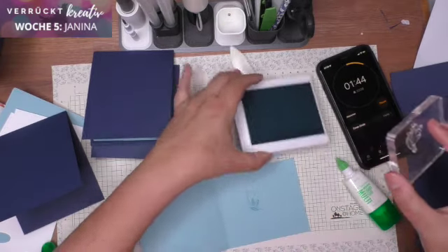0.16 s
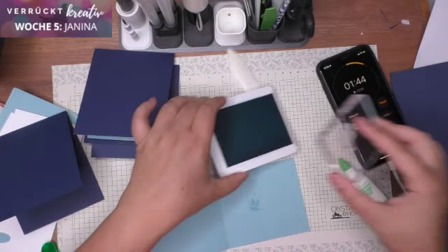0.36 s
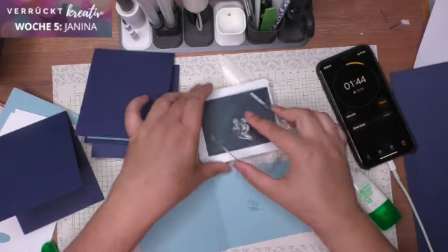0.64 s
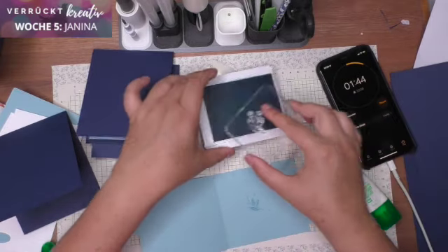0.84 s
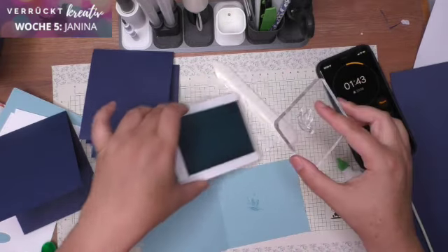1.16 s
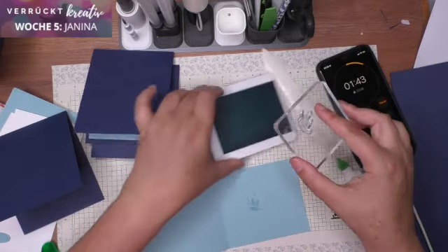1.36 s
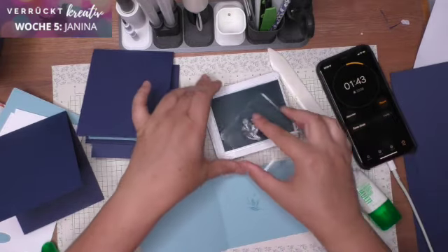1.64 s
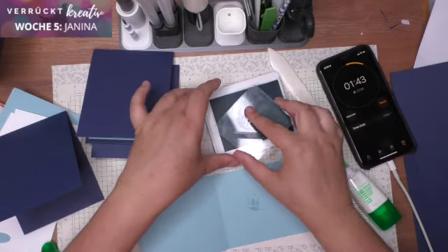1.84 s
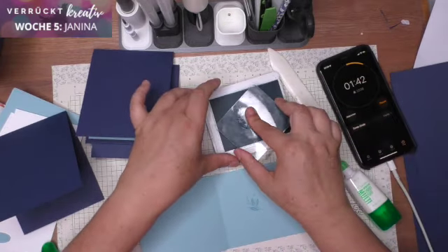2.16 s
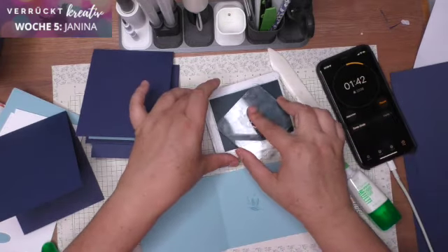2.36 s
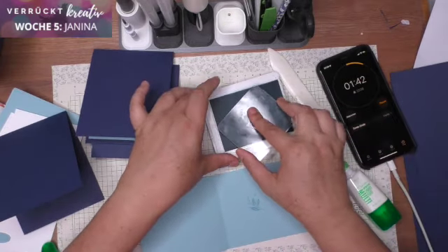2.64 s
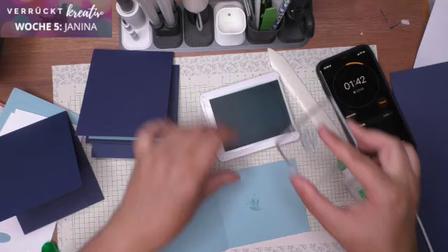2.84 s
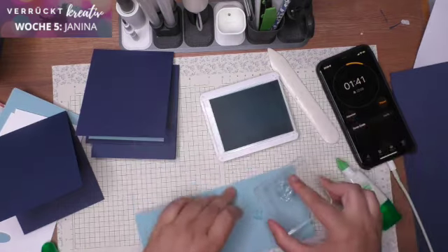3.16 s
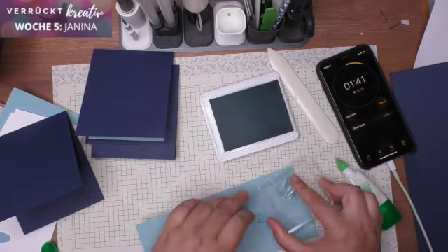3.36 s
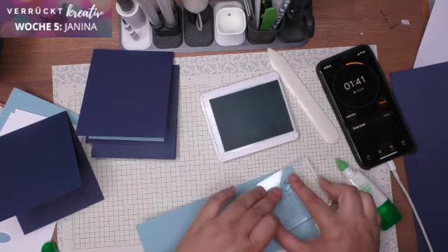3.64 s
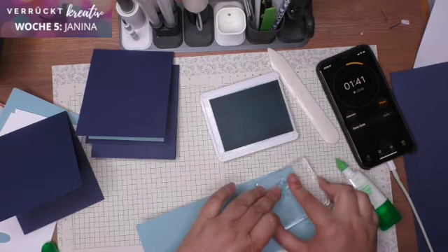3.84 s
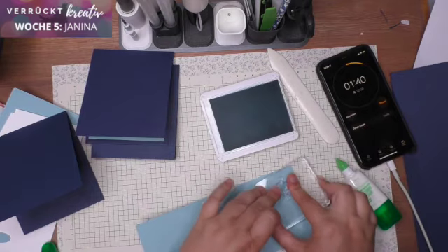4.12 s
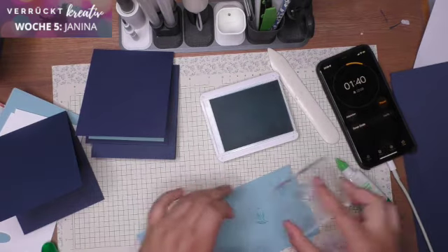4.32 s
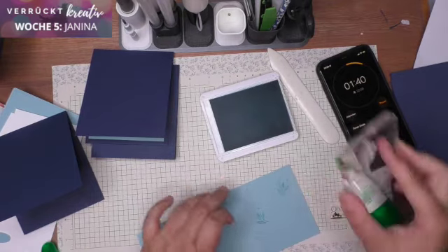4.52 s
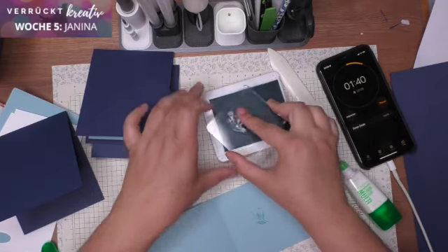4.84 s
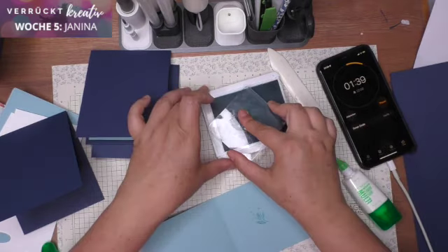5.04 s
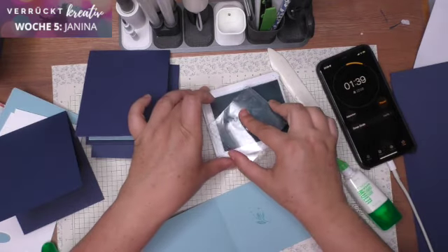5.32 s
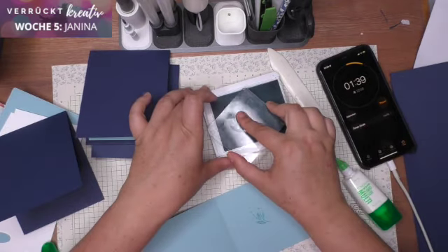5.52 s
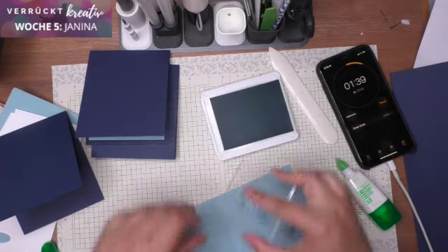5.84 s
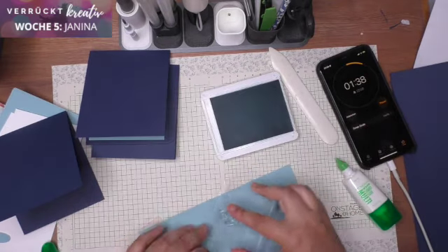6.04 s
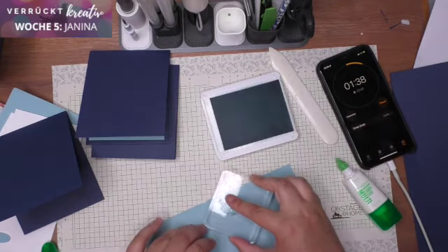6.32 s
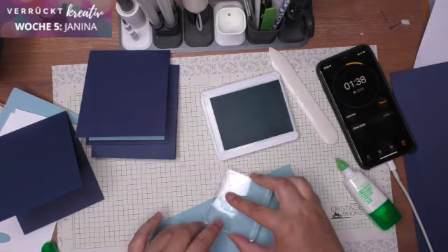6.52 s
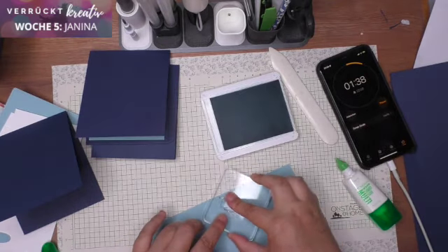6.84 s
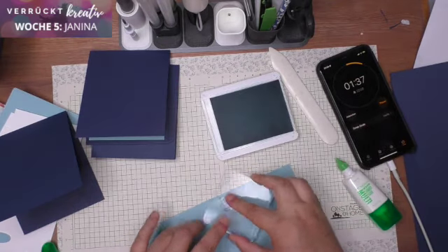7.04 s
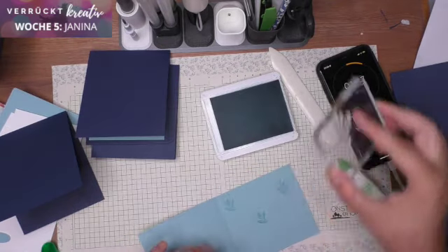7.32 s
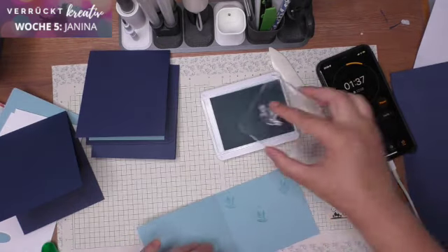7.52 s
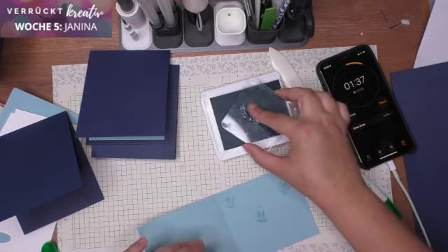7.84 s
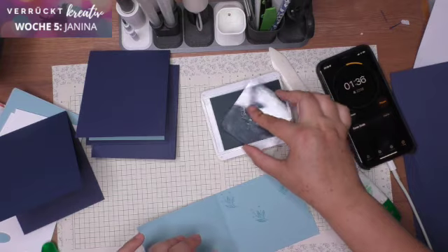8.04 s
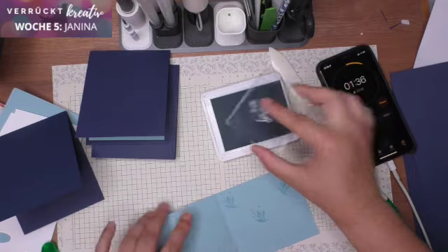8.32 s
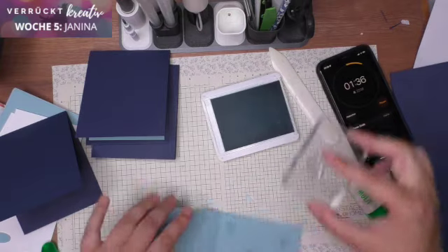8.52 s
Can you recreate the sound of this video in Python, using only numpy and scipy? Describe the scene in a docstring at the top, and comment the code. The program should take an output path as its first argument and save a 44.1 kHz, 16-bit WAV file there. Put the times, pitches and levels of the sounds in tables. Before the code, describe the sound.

A plastic case knocks and rattles into place, followed by soft stamping thuds, brief paper rubbing and crisp ticks of stiff card.

```python
"""At a craft desk in a small room, heard from just above: a card is being stamped.
A plastic ink pad is shoved into place and clatters against a folding tool: blows ring its case and edges.
An acrylic block is dabbed on the pad, thumping the desk and rocking the case, then pressed on cardstock.
The card ticks as the stamp lets go, and bursts of tiny slips make the rasp and hiss of hands on paper.
Under it lie filtered-noise room air and a faint deep sine drone that slowly glides in pitch."""
import sys
import numpy as np
from scipy import signal
from scipy.fft import rfft, irfft
from scipy.io import wavfile

SR = 44100
rng = np.random.default_rng(int(sys.argv[2]) if len(sys.argv) > 2 else 0)


def store_pcm(level_fs):
    """Save levels as 16-bit WAV."""
    pcm = np.round(np.clip(level_fs, -1, 1) * 32767).astype(np.int16)
    wavfile.write(sys.argv[1], SR, np.atleast_2d(pcm).T)


N = 382788   # length of the scene [samples]
AGE = np.arange(SR // 3) / SR   # time since a contact [s]
SCATTER_DB, DETUNE = 1.5, 0.008   # chance spread of each mode's strength [dB] and pitch [share]


def from_db(db):
    """Turn decibels into gain."""
    return 10 ** (np.asarray(db) / 20)


def rms_one(x):
    """Scale a sound to unit power."""
    return x / np.sqrt(np.mean(x ** 2) + 1e-20)


def at_level(sound, db, first_s):
    """Scale a sound so that its first moments have this rms level."""
    first_power = np.mean(sound[:int(first_s * SR)] ** 2)
    return from_db(db) * sound / np.sqrt(first_power + 1e-20)


def in_time(rows):
    """Draw straight lines between the rows: each column gets a value at every sample."""
    s, *columns = np.transpose(rows)
    return [np.interp(np.arange(N) / SR, s, column) for column in columns]


def add(track, s, sound):
    """Mix a sound into a track from a given moment."""
    start = max(0, int(s * SR))
    track[start:start + len(sound)] += sound[:N - start]


def coloured(x, spectrum):
    """Filter a sound to a spectrum, with the energy as early as possible (minimum phase)."""
    size = 2048
    hz, level_db = np.transpose(spectrum)
    bin_hz = np.fft.rfftfreq(size, 1 / SR)
    log_gain = np.log(from_db(np.interp(np.log(bin_hz + 1), np.log(hz), level_db)))
    # folding the cepstrum forward in time makes the filter causal
    cepstrum = irfft(log_gain)[:size // 2]
    cepstrum[1:] *= 2
    response = irfft(np.exp(rfft(cepstrum, size)))
    return signal.oaconvolve(x, response)[:len(x)]


def drift(rate):
    """Wander by chance, with `rate` new values a second joined by straight lines."""
    knots = rng.standard_normal(int(N / SR * rate) + 2)
    return np.interp(np.arange(N) / SR * rate, np.arange(len(knots)), knots)


def contact(grind_s, grit):
    """The force of a sharp touch followed by a dying burst of tiny slips."""
    slips = rng.standard_normal(len(AGE)) * np.exp(-AGE / grind_s)
    return (AGE == 0) + grit * slips / np.linalg.norm(slips)


def cushioned(force, soft_hz):
    """A yielding contact rounds off the force, so its treble is weaker."""
    return signal.sosfilt(signal.butter(2, soft_hz, fs=SR, output="sos"), force)


def favouring(modes, place_hz, octave_db):
    """The place of a blow favours modes near one pitch; others lose octave_db per octave away."""
    return [(hz, mode_db - octave_db * abs(np.log2(hz / place_hz)), t60) for hz, mode_db, t60 in modes]


def ring(force, modes):
    """A force rings the modes; each mode's strength and pitch vary a little by chance every time."""
    out = 0
    force = force + 1e-16 * np.arange(len(force))   # far too faint to hear
    for k, (hz, mode_db, t60) in enumerate(modes):
        strength, detune = rng.standard_normal(2)
        r = from_db(-60 / (t60 * SR))   # decay per sample
        w = 2 * np.pi * hz * (1 + DETUNE * detune) / SR   # turn per sample [radians]
        gain = from_db(mode_db + SCATTER_DB * strength) * (-1) ** k   # neighbours swing oppositely
        out = out + gain * signal.lfilter([1, 0, -1], [1, -2 * r * np.cos(w), r * r], force)
    return out


def small_body(sound, below_hz):
    """A small object cannot radiate long waves, so the sound is thinned below this pitch."""
    return signal.sosfilt(signal.butter(4, below_hz, "high", fs=SR, output="sos"), sound)


# Faint deep drone, like a far-off engine: (time [s], pitch [Hz], level [dB])
DRONE_PATH = [(0.0, 32.7, -75), (0.83, 36.4, -73), (1.61, 31.7, -81.5), (2.29, 34.6, -70.5),
              (2.8, 46.3, -72), (3.83, 37.4, -66.5), (4.63, 53.5, -71.5), (5.4, 66.6, -83)]
DRONE_FADE_DB_PER_S = 10   # after the last row it dies away


def drone():
    """A sine whose pitch and level glide from row to row."""
    hz, level_db = in_time(DRONE_PATH)
    fade_db = DRONE_FADE_DB_PER_S * np.maximum(np.arange(N) / SR - DRONE_PATH[-1][0], 0)
    sine = np.sin(2 * np.pi * np.cumsum(hz) / SR)
    return from_db(level_db - fade_db) * rms_one(sine)


# Colour of the room air and microphone hiss: (frequency [Hz], density [dB per Hz, relative])
AIR_SPECTRUM = [(15, -34.5), (25, -9.5), (48, -9.5), (76, -6.5), (134, -2.5), (242, -5), (277, -2.5),
                (607, -22), (754, -17), (1190, -13.5), (1330, -12.5), (2690, -16), (5730, -30),
                (10400, -24.5), (16000, -23)]
# How much the air differs between the two capsules: (frequency [Hz], side minus mid [dB])
AIR_WIDTH = [(60, -2.5), (180, 1.5), (550, -3.5), (1650, -2), (4970, -5), (15000, -10)]
AIR_DB = -62   # level of the part both capsules share


def room_air():
    """Steady noise; the two capsules share more of it in some bands than in others."""
    mid, side = (rms_one(coloured(rng.standard_normal(N), AIR_SPECTRUM)) for _ in range(2))
    return from_db(AIR_DB) * (mid + coloured(side, AIR_WIDTH) * [[1], [-1]])


def background():
    """Room air and microphone hiss over the drone."""
    return room_air() + drone()


# A hand, the pad or the card slides: (start [s], length [s], rasp level [dB], hiss level [dB])
SLIDES = [(0.0, 0.12, -55.5, -47.5), (0.188, 0.21, -57.5, -71), (0.727, 0.08, -54, -58.5),
          (1.604, 0.25, -79, -70.5), (2.754, 0.17, -59, -60.5), (2.9, 0.32, -68, -66),
          (3.089, 0.1, -57.5, -48.5), (3.167, 0.091, -56.5, -55), (3.295, 0.38, -75, -70.5),
          (4.152, 0.11, -58, -58), (4.28, 0.47, -73, -68.5), (4.991, .12, -63, -67),
          (5.588, 0.17, -65.5, -66), (5.998, 0.075, -59.5, -61), (6.045, 0.33, -76, -69),
          (6.956, 0.3, -66.5, -67), (7.382, 0.078, -60.5, -61.5), (8.323, 0.16, -64, -63),
          (8.422, 0.086, -59.5, -81), (8.527, 0.089, -55, -53), (8.59, .2, -58.5, -58.5)]
RISE_SHARE, FALL_SHARE = 0.13, 0.31   # of each slide's length


def stroke_gains():
    """Rasp and hiss follow the speed of each slide: it speeds up, holds, and slows to rest."""
    rasp, hiss = np.zeros((2, N))
    for s, length_s, rasp_db, hiss_db in SLIDES:
        done = np.linspace(0, 1, int(length_s * SR))
        speed = np.minimum(1, np.minimum(done / RISE_SHARE, (1 - done) / FALL_SHARE))
        add(rasp, s, from_db(rasp_db) * speed)
        add(hiss, s, from_db(hiss_db) * speed)
    return rasp, hiss


def friction(spectrum, grains_per_s, size_db, waver_db):
    """Paper fibres catch and slip, a few much harder than the rest, under uneven pressure."""
    sizes = from_db(size_db * np.minimum(rng.exponential(1, N), 4)) * rng.choice([-1, 1], N)
    grains = (rng.random(N) < grains_per_s / SR) * sizes
    pressure = from_db(waver_db * drift(90))
    return rms_one(coloured(grains * pressure, spectrum))


# Colour of sliding card: (frequency [Hz], density [dB per Hz, relative])
RASP_SPECTRUM = [(300, 1.5), (650, -16), (1000, -10.5), (1700, 1), (2400, 3), (3600, -1), (5000, -7.5),
                 (8000, -38)]
# Colour of skin on paper: (frequency [Hz], density [dB per Hz, relative])
HISS_SPECTRUM = [(2000, -14), (4000, -0.5), (5500, -2), (7000, -3), (11000, 1), (13500, -3.5),
                 (16000, -16.5)]
# Ringing modes of the card: (pitch [Hz], strength [dB], time to fall 60 dB [s])
CARD_MODES = [(1460, 3, 0.0047), (2100, -14.5, 0.012), (2070, -13.5, 0.011), (2603, -3.5, 0.01),
              (2740, -12, 0.03), (3640, -8, 0.0036)]


def rubs():
    """Sliding card rasps, and now and then an edge catches and rings it; skin on paper hisses."""
    rasp_gain, hiss_gain = stroke_gains()
    catches = (rng.random(N) < 140 / SR) * rng.standard_normal(N)   # about 140 a second
    crackle = rms_one(ring(cushioned(catches, soft_hz=5000), CARD_MODES))
    fibres = friction(RASP_SPECTRUM, grains_per_s=2000, size_db=3.0, waver_db=2.5)
    rasp = rms_one(fibres + 0.7 * crackle)
    hiss = friction(HISS_SPECTRUM, grains_per_s=12000, size_db=3.5, waver_db=1.4)
    return rasp_gain * rasp + hiss_gain * hiss


# Snaps of card, nail and tacky stamp: (time [s], level [dB], brightness [dB]) # the row at 6.136 s repeats the
# snap just before it, softer
SNAPS = [(3.0328, -56.5, 0), (3.7525, -63, -0.5), (4.2185, -47, 4.5), (6.0118, -63.5, -12),
         (6.1232, -35, -4), (6.136, -49, -1), (6.4975, -59, 2), (6.668, -60, 3), (7.0404, -48.5, 5),
         (7.1387, -59.5, 8.5), (7.5047, -62.5, -14), (7.637, -63.5, 1.5), (8.5175, -51.5, 1),
         (8.564, -53.5, 9.5)]
# Colour of the card's crack: (frequency [Hz], density [dB per Hz, relative])
CARD_CRACK_SPECTRUM = [(1500, -5.5), (2800, 5), (3700, 2), (5000, 0), (7000, -7), (11000, -10.5),
                       (16000, -14)]
TICK_HZ, TICK_OCTAVES_PER_DB = 2810, 0.07   # a brighter snap favours higher modes of the card


def ticks():
    """Stiff card snaps and rings for a few milliseconds."""
    out, first_s = np.zeros(N), 0.006
    for s, level_db, bright_db in SNAPS:
        card_hz = TICK_HZ * 2 ** (TICK_OCTAVES_PER_DB * bright_db)
        card = ring(contact(grind_s=0.0007, grit=0.29), favouring(CARD_MODES, card_hz, octave_db=15.5))
        crack = coloured(contact(grind_s=0.0039, grit=6.6), CARD_CRACK_SPECTRUM)
        add(out, s, at_level(small_body(card, below_hz=1380), level_db - bright_db, first_s))
        add(out, s, at_level(crack, level_db + bright_db, first_s))
    return out


# The block is dabbed on the pad:
# (time [s], weight on the desk [dB], mat knock level [dB], case level [dB])
PAD_DABS = [(1.52, -46, -37.5, -35), (1.592, -69, -61, -42.5), (1.9405, -59.5, -58.5, -65),
            (2.314, -69.5, -53, -51.5), (2.4487, -54, -51.5, -60), (2.6534, -62, -53, -52.5),
            (4.9745, -52.5, -63, -60), (4.994, -47, -43.5, -45), (5.183, -65, -54.5, -53),
            (5.26, -52.5, -52, -56), (5.3484, -76, -60.5, -59.5), (5.4104, -50.5, -44, -62),
            (7.7882, -49, -51, -52), (8.0501, -49, -53.5, -50), (8.1964, -47, -50.5, -43.5)]
DAB_BOOM_DB, DAB_DRUM_DB = -1.5, 3.5   # against the weight; the drum's applies to a firm dab
FIRM_DAB_DB, DRUM_GROWTH = -47, 2   # the board drums this many dB more per dB of weight
# The pad lands flat on the mat: (time [s], weight [dB])
PAD_LANDINGS = [(0.09, -43.5), (0.389, -43.5), (0.431, -43.5), (0.7501, -43.5), (1.1244, -32), (1.197, -45),
                (1.2609, -45.5), (1.3186, -45)]
LANDING_BOOM_DB, LANDING_KNOCK_DB = -16, 2   # against the weight
# The block bears down on the card: (time [s], weight [dB])
CARD_PRESSES = [(3.764, -51.5), (4.1842, -52), (6.667, -62)]
PRESS_BOOM_DB, PRESS_KNOCK_DB = -8.5, -7   # against the weight


def desk_blows():
    """How each kind of blow shares out its weight: (time [s], boom [dB], drum [dB], knock [dB])."""
    blows = []
    for s, weight_db, knock_db, _ in PAD_DABS:
        drum_db = FIRM_DAB_DB + DAB_DRUM_DB + DRUM_GROWTH * (weight_db - FIRM_DAB_DB)
        blows.append((s, weight_db + DAB_BOOM_DB, drum_db, knock_db))
    for s, weight_db in PAD_LANDINGS:
        blows.append((s, weight_db + LANDING_BOOM_DB, weight_db, weight_db + LANDING_KNOCK_DB))
    for s, weight_db in CARD_PRESSES:
        blows.append((s, weight_db + PRESS_BOOM_DB, weight_db, weight_db + PRESS_KNOCK_DB))
    return blows


def thud(modes, push_s, below_hz):
    """A cushioned push that rises and lets go rings the modes."""
    return small_body(ring(AGE * np.exp(-AGE / push_s), modes), below_hz)


# Ringing modes of the whole desk: (pitch [Hz], strength [dB], time to fall 60 dB [s])
DESK_MODES = [(103.7, -0.5, 0.36), (135, -2, 0.21)]
# Ringing modes of its top board: (pitch [Hz], strength [dB], time to fall 60 dB [s])
BOARD_MODES = [(160, -13, 0.059), (202.4, 0.5, 0.15), (261, -3, 0.1), (299.3, 1, 0.12)]
# Ringing modes of the mat under a blow: (pitch [Hz], strength [dB], time to fall 60 dB [s])
MAT_MODES = [(337, 0, 0.021), (391, 4, 0.015), (497, -5, 0.03), (525.4, -9.5, 0.012), (730, -6.5, 0.0063)]


def thuds():
    """A short knock on the mat; the board under it drums and the whole desk booms on."""
    out = np.zeros(N)
    slow_push_s, quick_push_s = 0.001, 0.0005
    for s, boom_db, drum_db, knock_db in desk_blows():
        boom = thud(DESK_MODES, slow_push_s, below_hz=94)
        drum = thud(BOARD_MODES, quick_push_s, below_hz=76)
        knock = thud(MAT_MODES, push_s=0.000082, below_hz=75)
        # the weight starts to bear just before the knock
        add(out, s - 2 * slow_push_s, at_level(boom, boom_db, first_s=0.04))
        add(out, s - 2 * quick_push_s, at_level(drum, drum_db, first_s=0.03))
        add(out, s, at_level(knock, knock_db, first_s=0.015))
    return out


# Hard plastic contacts:
# (time [s], level [dB], brightness [dB], favoured case pitch [Hz], favoured edge pitch [Hz])
# brightness raises the crack and lowers the case
HARD_CONTACTS = [(0.0005, -27.5, -2.5, 1360, 2930), (0.0889, -20, -1, 1380, 1970),
                 (0.0953, -27.5, -2.5, 1170, 2100), (0.0989, -27, 0.5, 1170, 2170),
                 (0.3871, -22, -3.5, 1310, 2500), (0.3975, -31.5, 12.5, 1150, 3420),
                 (0.4124, -29, 0.5, 1550, 2330), (0.7164, -57, 12.5, 1380, 1970),
                 (1.126, -28, -2, 1090, 3400), (1.1994, -27, -5, 1540, 2480),
                 (1.246, -22, -0.5, 1310, 2260), (1.2649, -22.5, 3.5, 1430, 2340),
                 (1.2767, -34, 3, 1400, 2430), (1.32, -22, 1.5, 1470, 2550),
                 (1.3396, -40.5, 8.5, 1080, 2783), (1.3577, -37, 2.5, 1283, 2190),
                 (5.5613, -45.5, -10.5, 1190, 2010), (5.5863, -50, -0.5, 1090, 2180)]
DAB_BRIGHTNESS_DB, DAB_CASE_HZ, DAB_EDGE_HZ = -9, 1045, 2550   # the felt makes every dab dull


def plastic_contacts():
    """Every touch on the pad's case, in the columns of HARD_CONTACTS; a dab is a dull one."""
    dabs = [(s, case_db + DAB_BRIGHTNESS_DB, DAB_BRIGHTNESS_DB, DAB_CASE_HZ, DAB_EDGE_HZ)
            for s, _, _, case_db in PAD_DABS]
    return HARD_CONTACTS + dabs


# The pad's case creaks under the hand:
# (time [s], case level [dB], favoured case pitch [Hz], edge level [dB])
CREAKS = [(0.027, -36.5, 1190, -54), (0.051, -38.5, 1160, -59), (0.498, -45, 1150, -57),
          (0.696, -45.5, 1210, -61), (0.709, -38.5, 1180, -65), (0.722, -28, 1470, -62),
          (0.731, -31, 1420, -55), (0.752, -40, 1300, -49.5), (0.849, -54.5, 1370, -65),
          (1.479, -47.5, 1400, -68), (2.701, -57, 1040, -65), (2.748, -56, 970, -71),
          (3.964, -59, 1600, -73), (5.185, -63, 1100, -64), (5.551, -50, 1150, -61),
          (7.811, -57, 1530, -66), (7.936, -53, 1110, -63.5), (7.957, -52, 1070, -64),
          (8.116, -57.5, 1030, -70), (8.514, -53.5, 1100, -56)]
# Ringing modes of the pad's case: (pitch [Hz], strength [dB], time to fall 60 dB [s])
CASE_MODES = [(801, -9, 0.011), (972, -4, 0.055), (1027, -18.5, 0.31), (1088, 2.5, 0.015),
              (1282, -2, 0.029), (1380, 0.5, 0.025), (1470, 0, 0.044), (1626, -1, 0.018)]
# Ringing modes of its stiff edges: (pitch [Hz], strength [dB], time to fall 60 dB [s])
EDGE_MODES = [(1946, -0.5, 0.0092), (2217, 2.5, 0.012), (2371, -2.5, 0.017), (2570, -6, 0.011),
              (2953, -7.5, 0.013), (3497, 1, 0.0074), (3950, -4, 0.014), (4300, -0.5, .008)]
ROCK_BACK_S, ROCK_BACK_DB = 0.038, -19   # after every contact the case rocks back once, later and softer
ROCK_EDGE_DB = -14   # the edges against the case as it rocks back


def rocks():
    """The case shifts on the mat and rocks back after every touch: a soft swell of slips rings it."""
    out, first_s, swell_s = np.zeros(N), 0.012, 0.002
    rock_backs = []
    for s, level_db, bright_db, case_hz, _ in plastic_contacts():
        back_db = level_db - bright_db + ROCK_BACK_DB
        rock_backs.append((s + ROCK_BACK_S, back_db, case_hz, back_db + ROCK_EDGE_DB))
    for s, case_db, case_hz, edge_db in CREAKS + rock_backs:
        swell = AGE * np.exp(-AGE / swell_s)
        force = cushioned(rng.standard_normal(len(AGE)) * swell, soft_hz=2400)
        case = small_body(ring(force, favouring(CASE_MODES, case_hz, octave_db=16.5)), below_hz=654)
        edge = small_body(ring(force, EDGE_MODES), below_hz=2630)
        # start early so that the swell peaks on time
        add(out, s - swell_s, at_level(case, case_db, first_s) + at_level(edge, edge_db, first_s))
    return out


# Colour of the plastic's crack: (frequency [Hz], density [dB per Hz, relative])
PLASTIC_CRACK_SPECTRUM = [(3000, -16), (4900, -9), (5600, -2), (6700, -9), (7700, -3), (9200, -8.5),
                          (10500, -3.5), (11800, -12), (13600, -13), (16000, -28)]
EDGE_DB, CRACK_DB = 0.8, -4.5   # against the level of a contact


def clacks(crack_grit):
    """Plastic on plastic: the hollow case, the stiff edges and a bright crack."""
    out, first_s = np.zeros(N), 0.006
    for s, level_db, bright_db, case_hz, edge_hz in plastic_contacts():
        case_force = cushioned(contact(grind_s=0.0012, grit=0.99), soft_hz=2600)
        case = ring(case_force, favouring(CASE_MODES, case_hz, octave_db=17.5))
        edge_force = cushioned(contact(grind_s=0.0011, grit=0.8), soft_hz=5620)
        edge = ring(edge_force, favouring(EDGE_MODES, edge_hz, octave_db=13.0))
        crack = coloured(contact(grind_s=0.0027, grit=crack_grit), PLASTIC_CRACK_SPECTRUM)
        add(out, s, at_level(small_body(case, below_hz=620), level_db - bright_db, first_s))
        add(out, s, at_level(small_body(edge, below_hz=910), level_db + EDGE_DB, first_s))
        add(out, s, at_level(crack, level_db + bright_db + CRACK_DB, first_s))
    return out


# Colour of the room's echoes: (frequency [Hz], level [dB])
ECHO_COLOUR = [(80, -19.5), (200, -2), (400, -0.5), (650, 2), (1030, -0.5), (1500, -4.5), (2500, -2),
               (5000, -1), (8000, -4), (15000, -4)]


def reflections(x, delay_s, build_s, t60, side_db):
    """Diffuse echoes, made of noise, that arrive after a delay, build up and die away."""
    t = np.maximum(np.arange(int(0.7 * SR)) / SR - delay_s, 0)
    shape = (1 - np.exp(-t / build_s)) * np.exp(-np.log(1000) * t / t60)
    mid, side = (coloured(rng.standard_normal(len(t)) * shape, ECHO_COLOUR) for _ in range(2))
    response = (mid + from_db(side_db) * side * [[1], [-1]]) / np.linalg.norm(mid)
    return signal.fftconvolve(x[None], response, axes=1)[:, :N]


def desk_dip(x, dip_hz, q, depth):
    """The bounce off the desk top cancels part of one band at the microphone."""
    band = signal.lfilter(*signal.iirpeak(dip_hz, q, fs=SR), x)
    return x - np.clip(depth, 0, 1) * band


def scene():
    """Everything on the desk shares the near echoes and the room; the clatter fills the room most."""
    handling = rocks() + thuds() + ticks() + rubs()
    direct = clacks(crack_grit=3.4) + handling
    all_round = clacks(crack_grit=0.29)   # summed over all directions, a crack's spectrum is smooth
    near = from_db(-10.0) * reflections(direct, delay_s=0.0011, build_s=0.00093, t60=0.066, side_db=-3)
    to_room = from_db(-12.5) * all_round + from_db(-14.5) * handling
    far = reflections(to_room, delay_s=0.0057, build_s=0.0047, t60=0.42, side_db=-10.5)
    desk = desk_dip(direct + near + far, dip_hz=590, q=11.0, depth=0.75)
    balance = from_db([[-0.25], [0.25]])   # left a touch softer than right
    return (desk + background()) * balance


def record(dry):
    """A steep low-pass filter cuts the top above 16.2 kHz."""
    return signal.sosfilt(signal.ellip(10, 0.1, 90, 16200, fs=SR, output="sos"), dry)


dry = scene()
out = record(dry)
store_pcm(out)
```